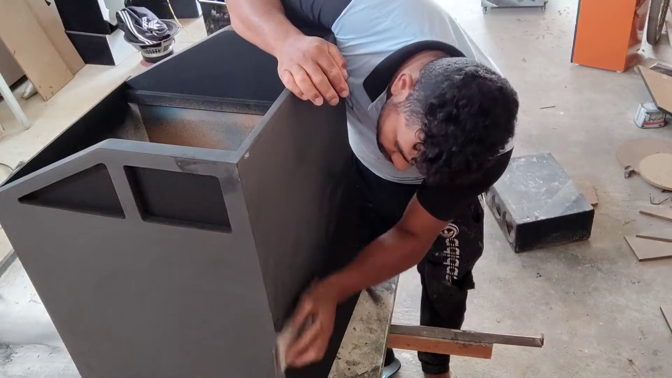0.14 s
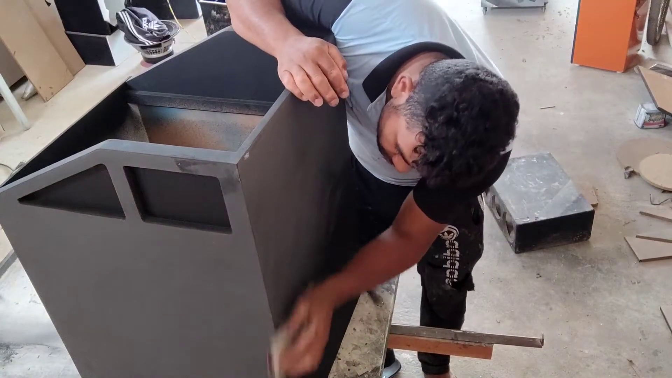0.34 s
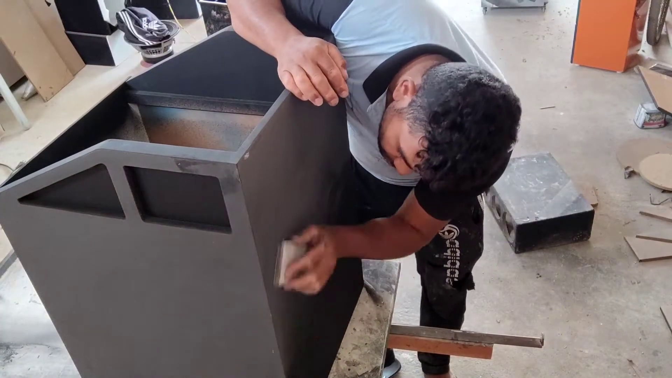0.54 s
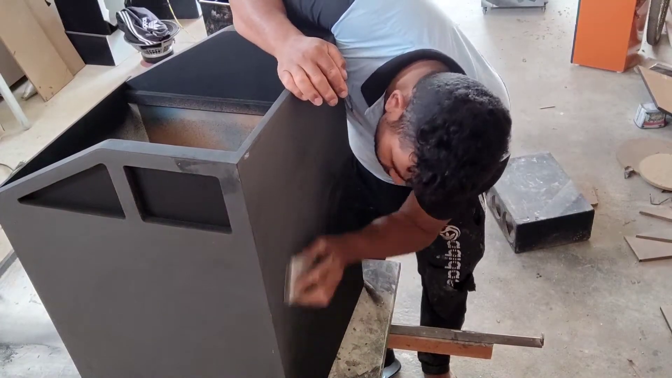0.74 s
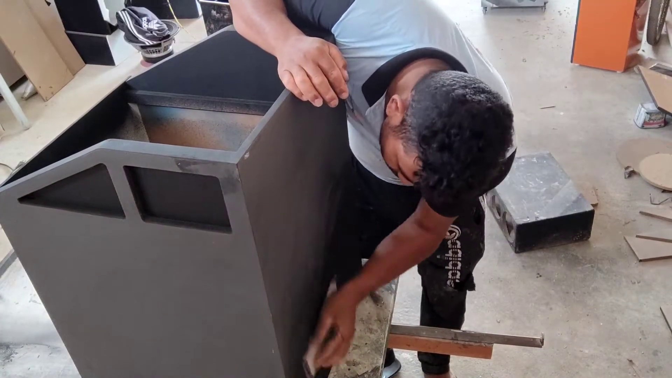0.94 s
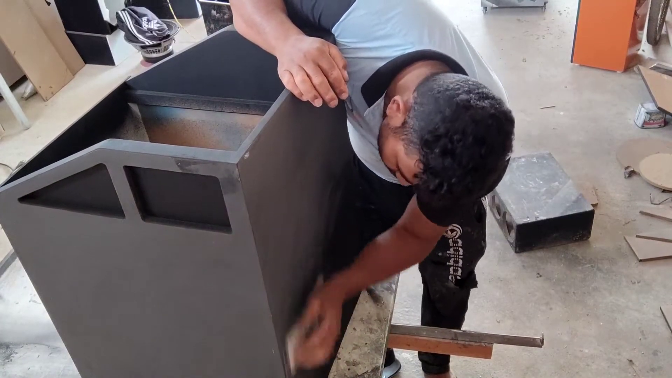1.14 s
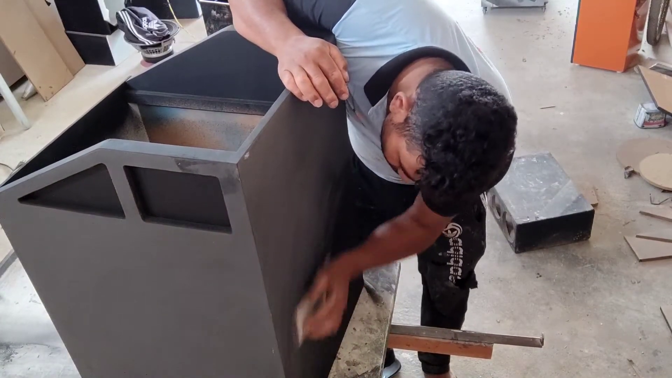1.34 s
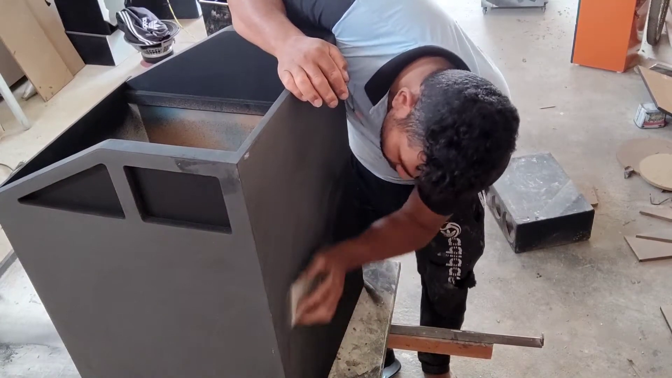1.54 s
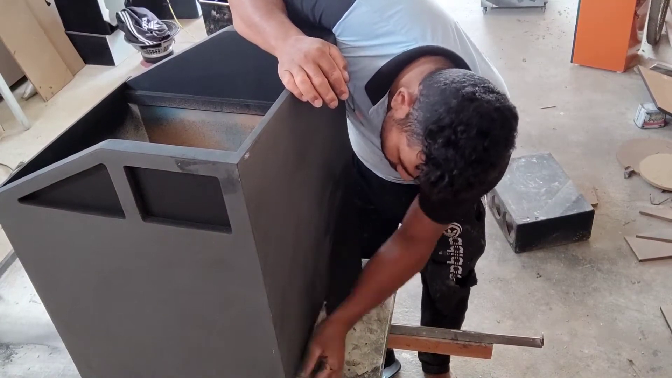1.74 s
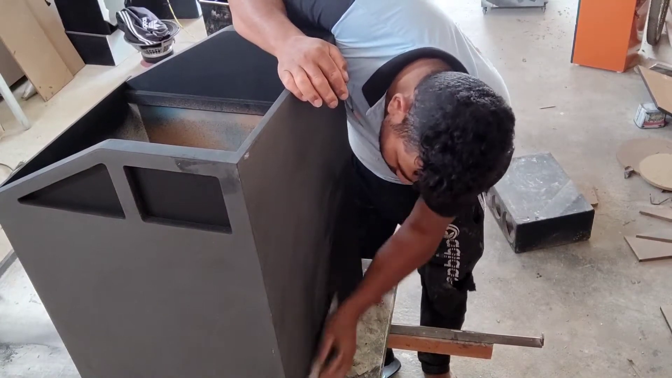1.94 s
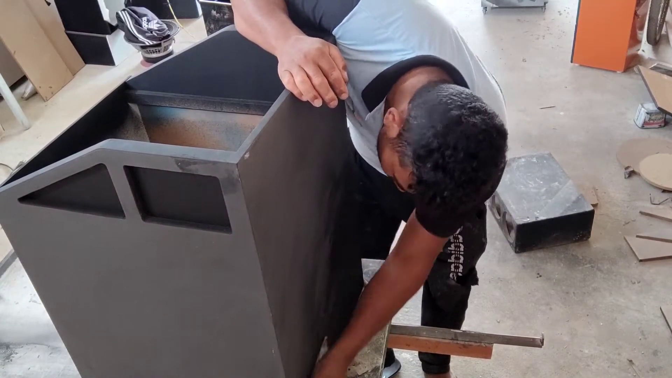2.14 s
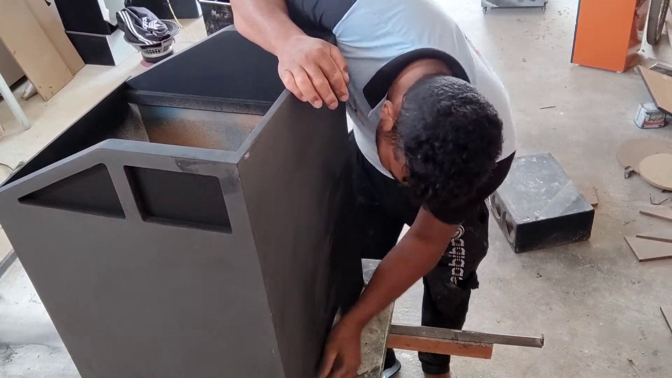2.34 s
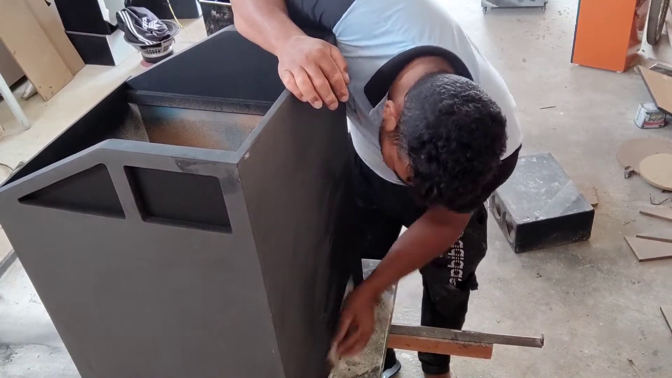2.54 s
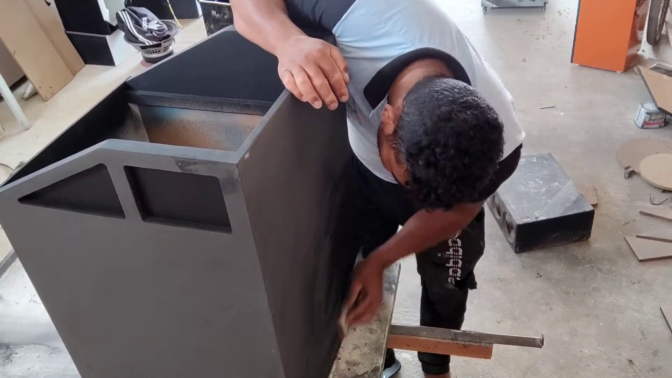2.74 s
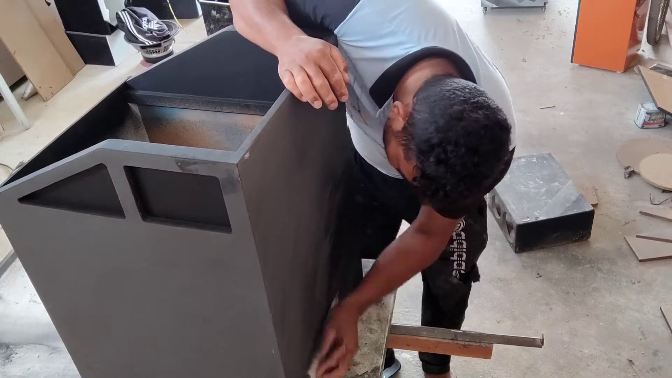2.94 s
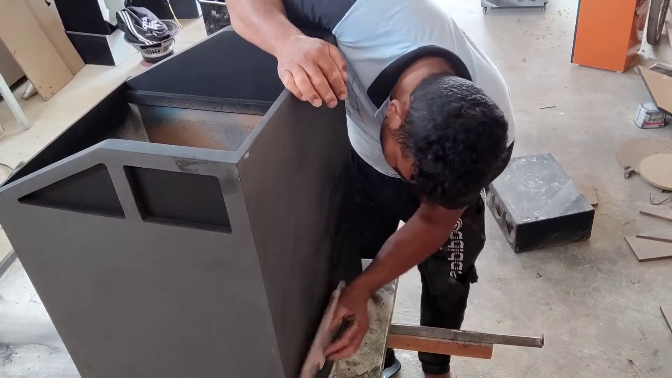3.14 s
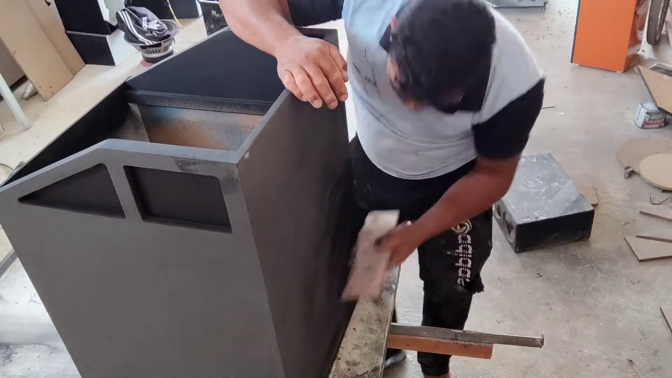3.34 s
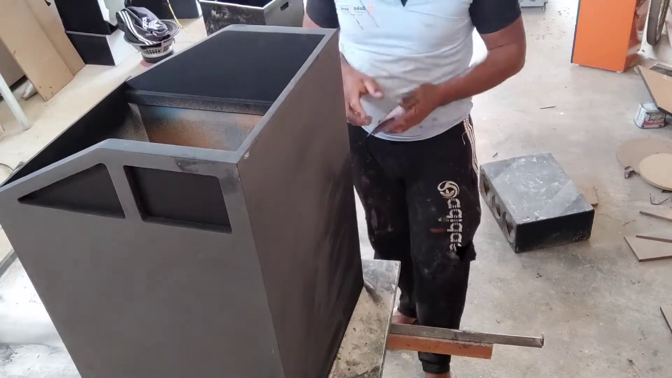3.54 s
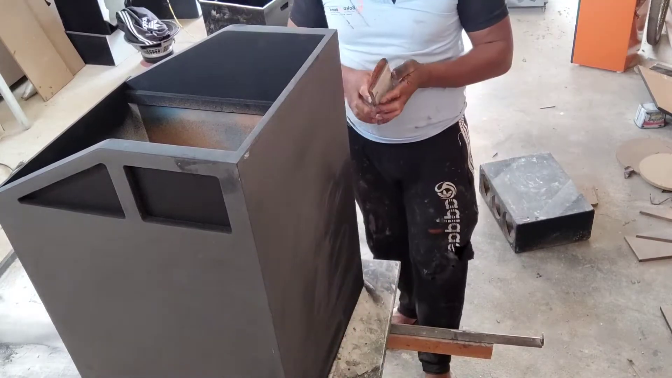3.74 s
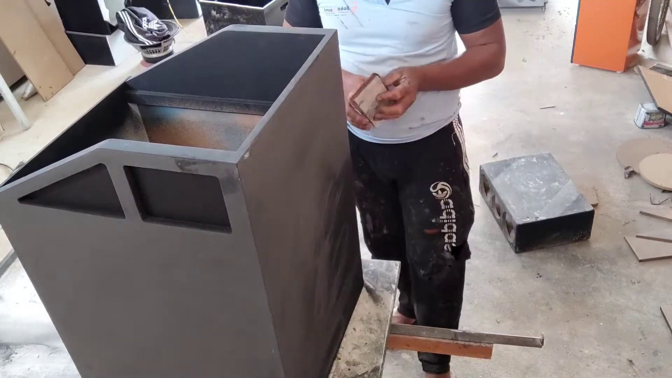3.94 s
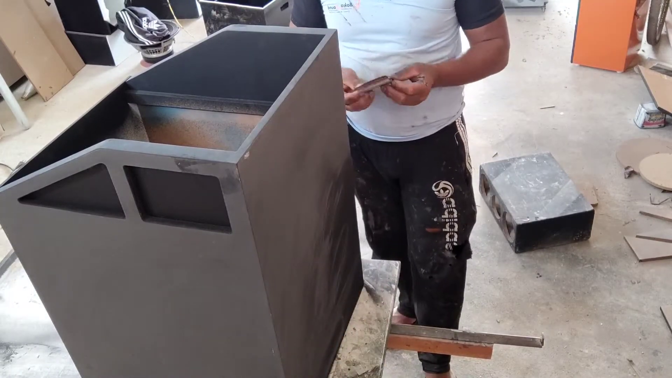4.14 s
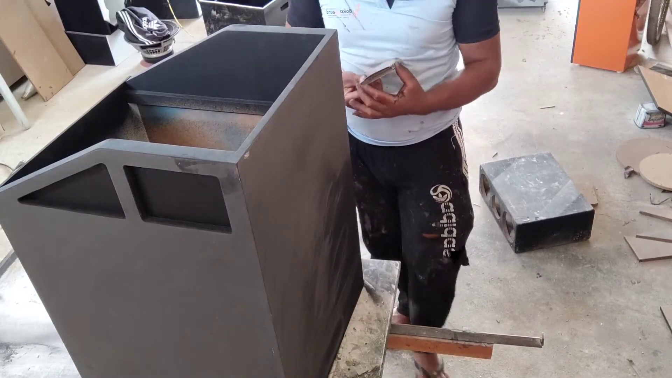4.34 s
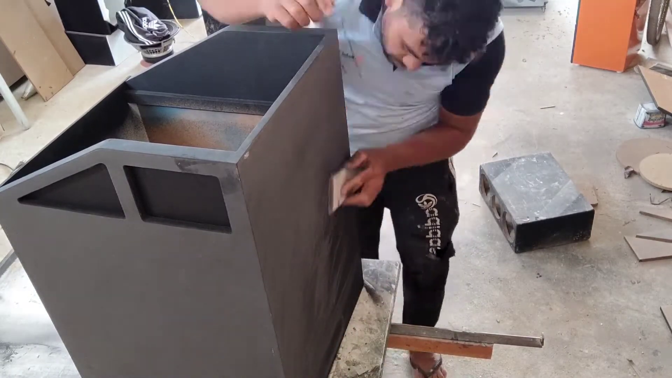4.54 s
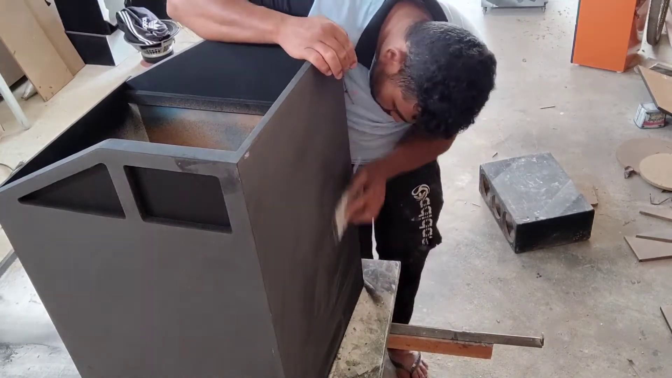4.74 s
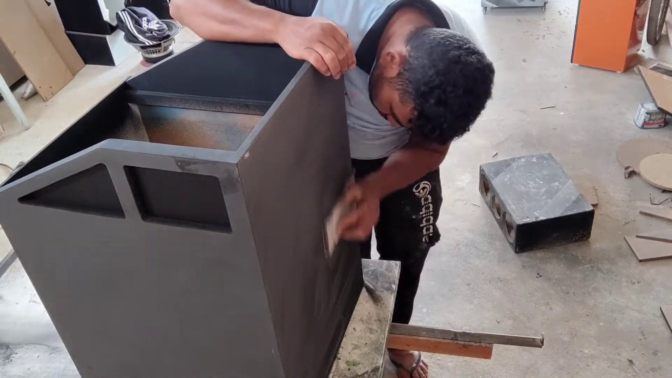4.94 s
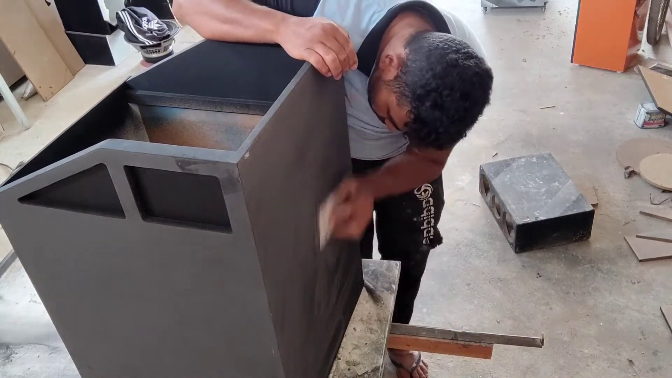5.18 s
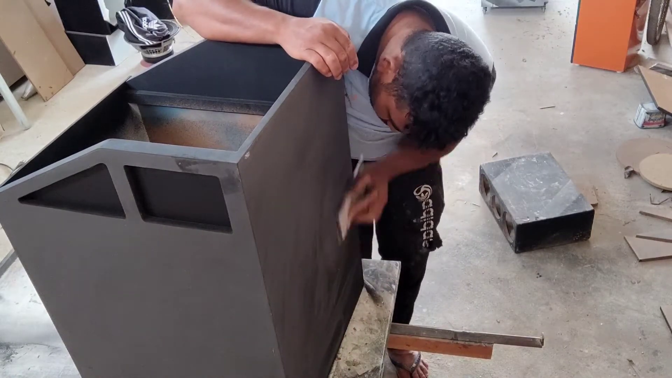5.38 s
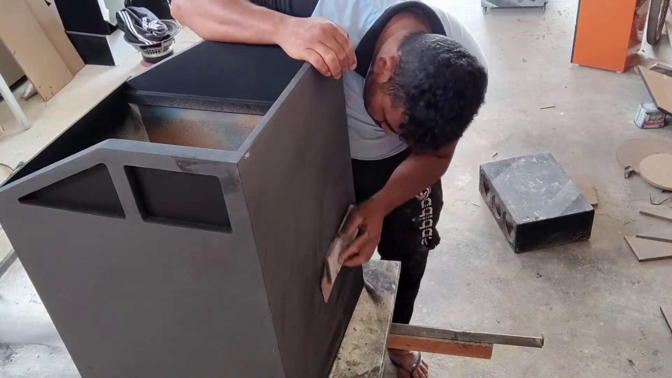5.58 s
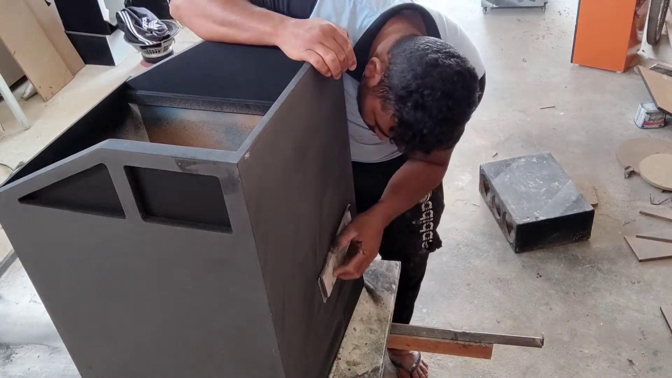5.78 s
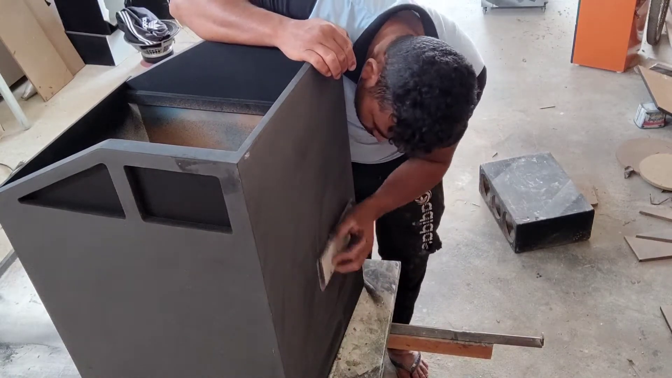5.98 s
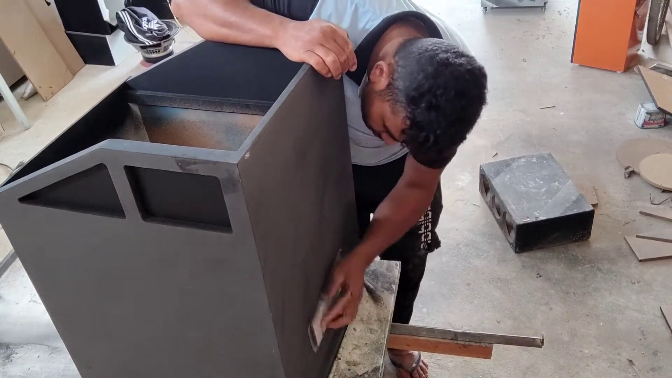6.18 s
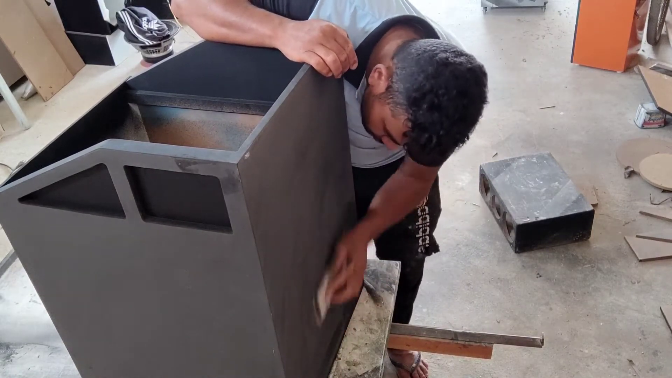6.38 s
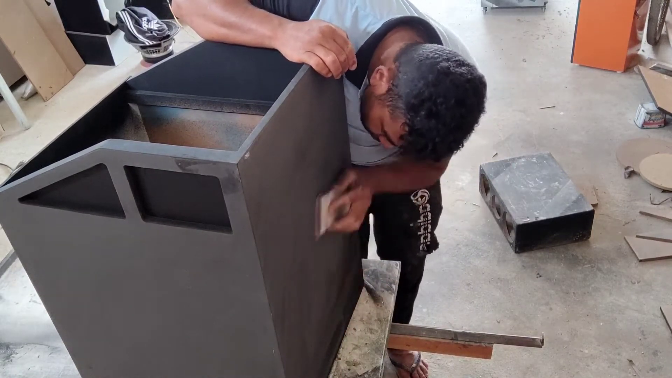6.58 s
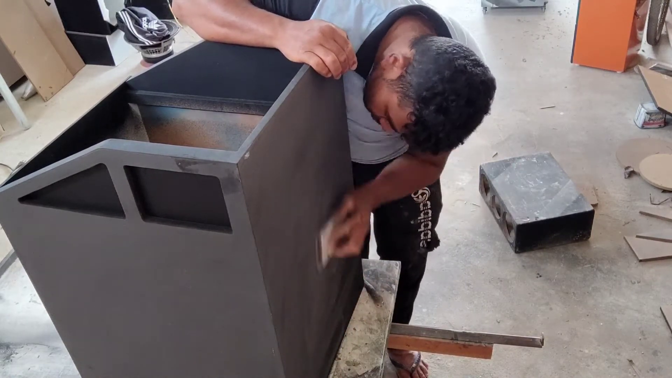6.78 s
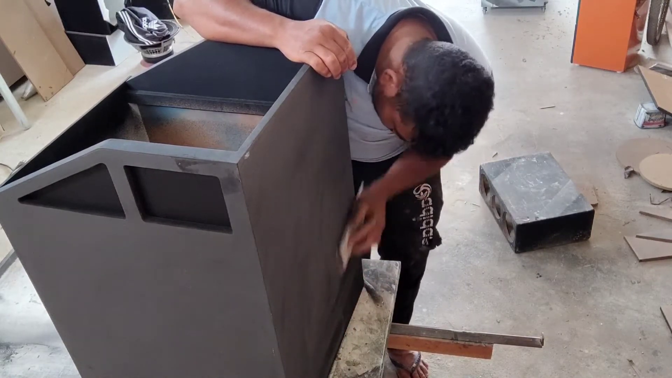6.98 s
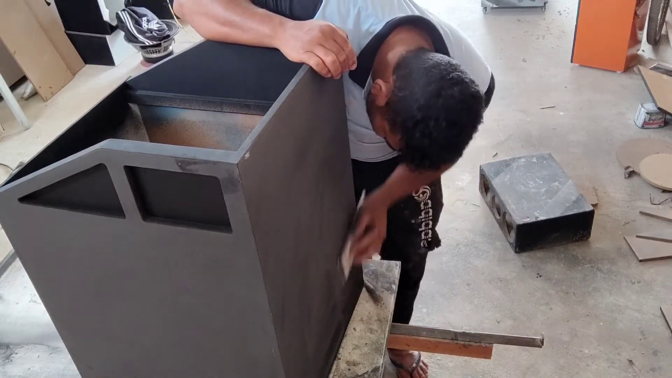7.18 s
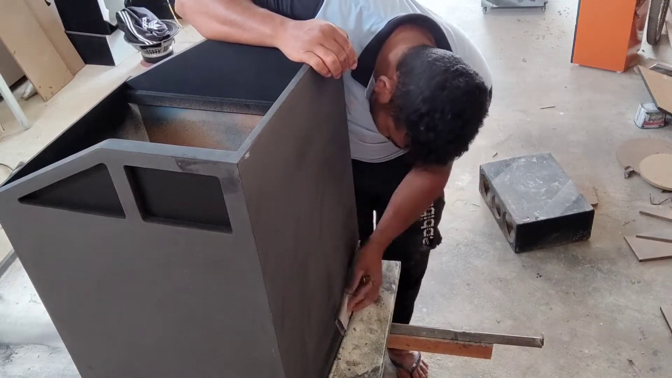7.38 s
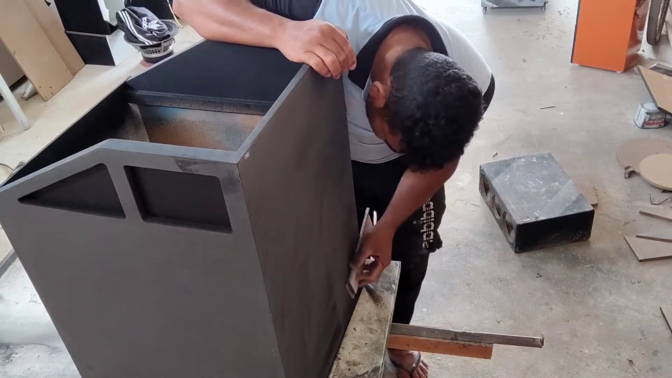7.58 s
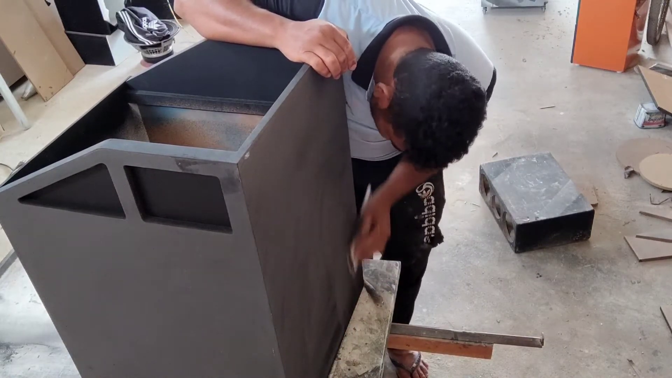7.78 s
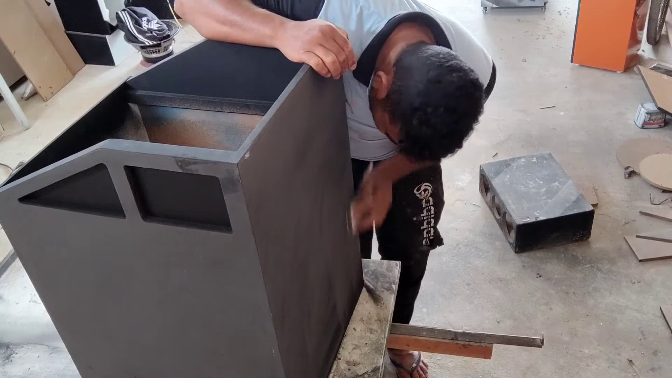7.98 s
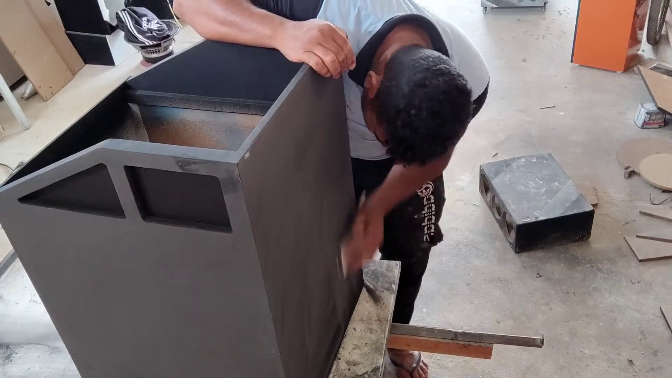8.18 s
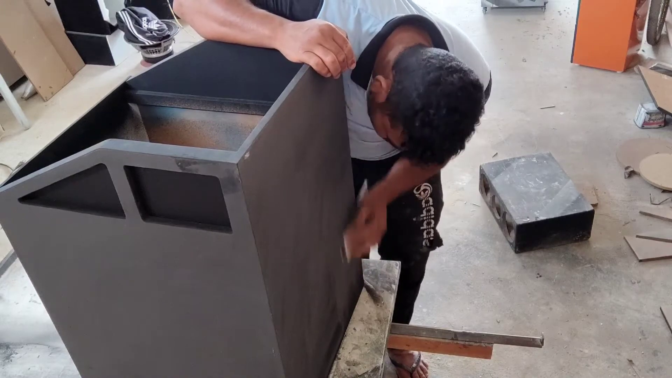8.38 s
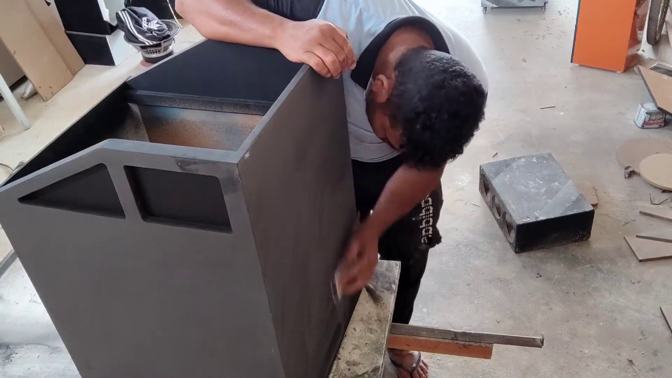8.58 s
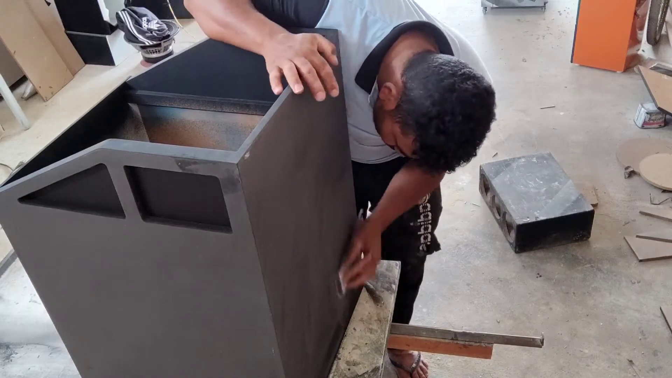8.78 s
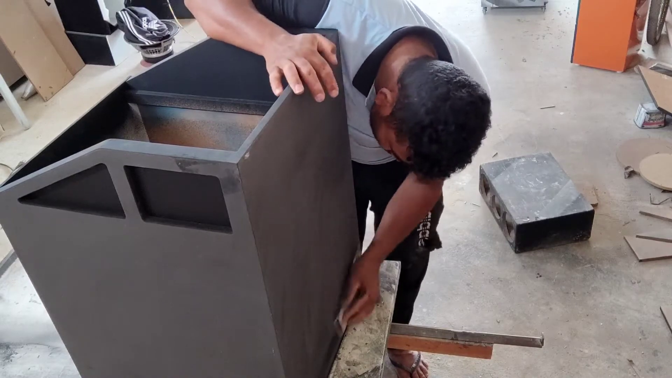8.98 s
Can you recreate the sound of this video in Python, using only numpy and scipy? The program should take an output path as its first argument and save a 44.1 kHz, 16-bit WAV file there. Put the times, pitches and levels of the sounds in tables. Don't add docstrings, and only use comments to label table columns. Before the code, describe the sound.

Heard close in a workshop with a low, wavering hum, sandpaper scrubs a coated hollow wooden box. From 0 s a bright, dense hiss pulses very fast, about twenty-five to thirty single strokes a second, dipping at every turn; a woody scrape and faint hollow hum lie under it. From 2.2 to 3.15 s strokes slow to ten or so a second and separate more clearly. The paper lifts; at 3.25 s a brush and clear mid-pitched knuckle knock, then small brushes and soft low thuds near 3.5 s. It is nearly silent, with a tiny far sole squeak at 3.75 s and thin grainy folding swishes around 4.1 s. At 4.57 s a bump starts rapid sanding again until 5.6 s. After light touches, another pass runs 6.05 to 7.57 s, and a last from 7.7 to 9.03 s, cutting off quickly. The treble is strong and resonant, differently coloured left and right, with a steep top cutoff.

```python
import sys
import numpy as np
from scipy import signal
from scipy.fft import rfft, irfft, next_fast_len
from scipy.io import wavfile
from scipy.ndimage import uniform_filter1d

SR = 44100
rng = np.random.default_rng(int(sys.argv[2]) if len(sys.argv) > 2 else 0)


def unload_audio(sound):
    columns = np.transpose(np.atleast_2d(sound))
    steps = np.round(np.clip(columns, -1, 1) * 32767)
    wavfile.write(sys.argv[1], SR, steps.astype(np.int16))


def invert_db(x):
    u = np.asarray(x, float) / 20
    return 10 ** u


N = 397775

# (first_turn_s, strokes, grit_level_db, dip_at_turn_db, panel_pressure_db)
MIDDLE_RUNS = [(4.575, 1, -23, 23, -23.5), (4.624, 2, -16, 9, -27.5), (4.707, 6, -16.5, 6.4, -27.5),
               (4.933, 2, -17.5, 4.5, -28.5), (5.018, 4, -17, 5.5, -27), (5.168, 1, -18, 3.8, -25.5),
               (5.25, 2, -17.5, 2.9, -26), (5.336, 2, -15.5, 7, -25.5), (5.41, 1, -18, 4.3, -27),
               (5.484, 3, -18, 4.7, -27.5)]
# (start_s, peak_db, fade_db_per_s, panel_pressure_db)
TOUCHES = [(3.257, -28.5, 340, -26), (3.366, -35.5, 260, -27), (3.395, -39, 700, -28.5),
           (3.437, -48, 500, -27), (3.484, -43, 300, -33), (3.51, -54.5, 300, -23), (3.53, -51, 700, -32),
           (3.591, -60, 250, -28), (3.624, -61, 152, -27), (3.678, -63, 300, -29),
           (3.813, -65.5, 250.5, -26), (3.871, -65, 250, -26.5), (3.924, -61, 350, -29),
           (4.02, -67, 150, -30), (4.096, -52, 350, -31.5), (4.169, -58, 350, -35.5),
           (4.274, -70, 300, -31), (4.298, -66, 500, -36), (4.402, -57, 200, -30),
           (4.441, -45.5, 550, -20.5), (4.494, -49.5, 450, -31), (4.52, -45, 600, -30.5),
           (5.61, -32.5, 240, -25), (5.689, -41.5, 270, -32), (5.731, -45, 500, -32),
           (5.89, -60.5, 450, -33), (5.958, -66, 176, -34), (6.034, -57, 200, -36.5), (6.01, -62, 100, -35),
           (7.655, -65, 100, -31.5), (7.69, -62, 300, -37)]
LANDING_S = 0.023


def sanding(t, speed, pressure_db):
    # (time_s, left_minus_right_db)
    sideways = [(0, -1.9), (3.5, -2.5), (4.24, -3), (4.6, -1.5), (9.02, -0.5)]
    # (pitch_hz, level_db_per_hz)
    grit = [(5000, -17), (6300, -7.5), (7300, -2.5), (10000, -0.5), (13000, 0.5), (15000, -4)]
    bite, give, panel_ring_s = 0.49, 0.35, 0.0027

    smooth_speed = np.sqrt(uniform_filter1d(speed ** 2, max(int(panel_ring_s * SR), 1)) + 1e-18)
    ringing = smooth_speed ** (1 - give)
    speed = speed * (speed / uniform_filter1d(speed, SR // 40)) ** bite

    pan_db = np.interp(t, *np.transpose(sideways))
    hiss = through_ports(coloured(grains(spread_db=0.36), grit))
    hiss = hiss / np.sqrt(np.mean(hiss ** 2))
    hiss = hiss * invert_db(0.6 + 1.4 * walk(120) + np.array([pan_db, -pan_db]) / 2)
    scrape = ringing * panel(t) * invert_db(pressure_db + 3.5 + 1.53 * walk(30))
    return speed * hiss + scrape


def hand(t):
    low_quick = [(0, 1, -18.5, -2.5, -27.5), (.032, 1, -18, 4, -25), (.103, 4, -17, 5, -26.5),
                 (.263, 2, -17, 6.5, -26), (.337, 4, -18, 5.5, -28.5), (.486, 2, -20.5, 7, -28.5),
                 (.56, 2, -17, 10, -28), (.644, 2, -20, 9, -28), (.729, 1, -17.5, 6, -27),
                 (.786, 1, -17.5, 6, -27), (.821, 1, -17, 8.5, -26.5), (.876, 1, -17, 3, -23.5),
                 (.978, 1, -18, 2.5, -24), (1.05, 2, -15.5, 7.5, -26.5), (1.127, 8, -16.2, 11, -27),
                 (1.453, 2, -17, 8, -26), (1.543, 4, -18, 5, -26), (1.707, 2, -17.5, 6.5, -26.5),
                 (1.788, 2, -16, 9, -26), (1.885, 2, -17, 6, -25.5), (2.044, 1, -16.5, 2.5, -26),
                 (2.085, 2, -18.5, 1, -25.5)]
    low_slow = [(2.225, 1, -21, 11, -24.5), (2.306, 1, -22.5, 8.2, -23.5), (2.387, 1, -18, 16.4, -27),
                (2.481, 1, -18, 7, -25), (2.565, 1, -17.5, 17, -27.5), (2.666, 1, -17.5, 5.9, -24.5),
                (2.755, 1, -17.5, 16.4, -29.5), (2.847, 1, -17, 3.8, -24.5), (2.916, 1, -16, 7, -29.5),
                (2.976, 2, -17, 5.6, -25), (3.088, 1, -18, 4.7, -23)]
    upper = [(6.045, 1, -28.5, 12, -27), (6.087, 2, -18, 11, -27), (6.159, 4, -18.5, 3.2, -27),
             (6.316, 4, -18, 2.9, -26.5), (6.49, 2, -16.5, 4.3, -25), (6.59, 2, -17.5, 5.9, -25.5),
             (6.664, 2, -19, 2.2, -24.5), (6.747, 2, -19, 3.7, -26.5), (6.834, 1, -18.5, 2.3, -27),
             (6.916, 2, -17, 7.4, -26.5), (7.002, 8, -17, 8.7, -26), (7.336, 2, -17.5, 8.7, -26),
             (7.427, 2, -16.3, 7.5, -26), (7.513, 1, -16.5, 9.7, -27.5), (7.548, 1, -20, 2, -25.5)]
    last = [(7.719, 1, -21.5, 23.4, -25), (7.778, 2, -17.5, 9.6, -25), (7.853, 4, -18.5, 6.2, -27),
            (8.014, 2, -20.5, 4.9, -29.5), (8.089, 2, -22, 7.1, -25), (8.164, 2, -19, 8.6, -27),
            (8.25, 2, -18.7, 6.8, -26), (8.322, 1, -19, 4.3, -27), (8.4, 2, -19, 5, -26.5),
            (8.493, 2, -19, 2.3, -27), (8.565, 1, -19, 3.9, -27.5), (8.64, 2, -19.5, 3.5, -27),
            (8.723, 1, -19.5, 3, -26), (8.767, 1, -19, 2.8, -26.5), (8.86, 2, -18.5, 3, -25.5),
            (8.949, 1, -20, 1.8, -27.5)]
    # (time_s, grit_level_db, fall_db_per_s)
    lifts = [
        (3.148, -29, 421),
        (5.601, -25.5, 500),
        (7.573, -23.5, 650),
        (9.03, -23, 500),
    ]
    round_top, rest_db = 0.042, -76.5

    runs = [low_quick + low_slow, MIDDLE_RUNS, upper, last]
    passes = [strokes(*one) for one in zip(runs, lifts)]
    times, db = np.vstack([shape for shape, _ in passes]).T
    stroking = np.interp(t, times, invert_db(round_top * db)) ** (2 / round_top)
    touching = peaks(t, TOUCHES, rise_db_s=1400)
    resting = invert_db(2 * (rest_db + 1.5 * walk(24.94)[0]))
    speed = np.sqrt(stroking + touching + resting)

    pressure = [row for _, rows in passes for row in rows]
    pressure = sorted(pressure + [(row[0], row[3]) for row in TOUCHES])
    return uniform_filter1d(speed, SR // 200), np.interp(t, *np.transpose(pressure))


def strokes(runs, lift):
    push_share, rise_share = 0.5, 0.42
    fall_s, sag_db = 0.026, 1.5
    pull_db, pull_dip, pull_panel_db = -0.12, 0.64, -1.5
    scatter_db, silent_db = -0.1, -79
    lift_s, lift_db, fall_db_s = lift

    shape, pressure = [(runs[0][0] - LANDING_S, silent_db)], []
    ends = [run[0] for run in runs[1:]] + [lift_s]
    for (start, count, db, dip_db, panel_db), end in zip(runs, ends):
        count = int(round(count))
        step = (end - start) / count
        turns = [start + step * (k - k % 2 + k % 2 * 2 * push_share) for k in range(count)] + [end]
        for k, chance in enumerate(scatter_db * rng.standard_normal((count, 3))):
            pull = k % 2
            full = turns[k] + rise_share * (turns[k + 1] - turns[k])
            glide = max(turns[k + 1] - fall_s, full + 1e-3)
            top = db + pull * pull_db + chance[0]
            shape.append((turns[k], db - dip_db * pull_dip ** pull + chance[1]))
            shape.append((full, top))
            shape.append((glide, top - sag_db * (glide - full) / fall_s))
            pressure.append((full, panel_db + (pull - (count > 1) / 2) * pull_panel_db + chance[2]))
    shape.append((lift_s, lift_db))
    shape.append((lift_s + (lift_db - silent_db) / fall_db_s, silent_db))
    return shape, pressure


def panel(t):
    foot = [(530, -48.5), (900, -24), (1960, -14), (2980, -8.5), (4180, -6.5), (6400, -4.5), (8320, -22.5),
            (14100, -120)]
    paper = [(530, -31), (900, -10), (1210, -8), (1480, -3.5), (2910, 0), (6400, -1), (8320, -4),
             (14100, -120)]
    higher = [(530, -28), (900, -25), (1120, -17.5), (1600, -14), (2820, -5), (4350, -5), (6400, -4),
              (8320, -19), (14100, -120)]

    place = np.searchsorted([TOUCHES[0][0] - LANDING_S, MIDDLE_RUNS[0][0] - LANDING_S], t)
    scrape = patchy(grains(spread_db=1.2), mode_db=4)
    tones = [coloured(scrape, tone, 1200, 5000) for tone in (foot, paper, higher)]
    return np.choose(place, tones)


def through_ports(x):
    # (pitch_hz, width_hz, lift_db, slope_above_db_per_khz)
    holes = [
        (11060, 1470, 14, 0),
        (8920, 820, 15.5, -0.62),
    ]
    x = np.pad(x, ((0, 0), (0, next_fast_len(N + 1) - N)))
    return np.array([port(side, *hole)[:N] for side, hole in zip(x, holes)])


def port(x, hz, width_hz, lift_db, slope_db):
    f = np.arange(len(x) // 2 + 1) * SR / len(x)
    gain = np.sqrt(1 + invert_db(2 * lift_db) / (1 + (2 * (f - hz) / width_hz) ** 2))
    loss = invert_db(slope_db * np.maximum(f - hz, 0) / 1000)
    return irfft(rfft(x) * gain * loss, len(x))


def body(t, speed):
    # (pitch_hz, level_db_per_hz)
    box = [(120, -13.5), (250, -5), (400, 0), (600, -0.5), (1000, -1), (2200, -14)]
    # (peak_s, peak_db, slope_both_sides_db_per_s)
    leans = [(.25, -58.5, 48), (.91, -61, 19.5), (2.45, -55.5, 122), (2.63, -47.5, 238), (3.1, -64.5, 62),
             (3.262, -61.5, 75), (3.36, -64, 54), (3.52, -68, 84), (3.62, -67, 10), (4.44, -74, 66),
             (5.61, -54, 250), (5.9, -74.5, 21), (6.06, -62.5, 150), (7.79, -64.5, 71)]
    hum_db, stroke_db, follows = -63, -20.5, 0.34

    driven = invert_db(hum_db) * (uniform_filter1d(speed, SR // 30) / invert_db(stroke_db)) ** follows
    level = np.sqrt(driven ** 2 + peaks(t, leans))
    return coloured(partly_alike(0.27), box, 280, 1065) * level * invert_db(1.0 * walk(18))


def folding(t):
    # (peak_s, peak_db, slope_both_sides_db_per_s)
    folds = [
        (4.02, -71, 300),
        (4.072, -55, 450),
        (4.128, -54, 350),
        (4.192, -59, 450),
    ]
    # (pitch_hz, level_db_per_hz)
    colour = [(6800, -25), (7500, -7), (8800, 0), (9800, -20)]
    pan_db = -8
    swish = coloured(grains(spread_db=2.0), colour)
    swish = swish * invert_db(np.array([[pan_db], [-pan_db]]) / 2 + 2.0 * walk(80))
    return swish * np.sqrt(peaks(t, folds))


def knuckle_taps():
    # (start_s, peak_db, pitch_hz)
    taps = [
        (3.253, -39.5, 880),
        (3.305, -55, 860),
    ]
    return knocks(taps, t60_s=0.14, soft_s=0.0037, rough=0.46)


def box_bumps():
    # (start_s, peak_db, pitch_hz)
    bumps = [
        (1.552, -57, 155),
        (3.486, -54, 180),
        (3.517, -48, 145),
        (4.574, -47.5, 163),
        (5.869, -61.5, 124),
        (6.242, -53, 157),
    ]
    return invert_db(16) * knocks(bumps, t60_s=0.066, soft_s=0.0098, rough=0.29)


def sole_squeak():
    # (start_s, peak_db, pitch_hz)
    squeak = [
        (3.745, -68, 3820),
    ]
    return invert_db(9) * knocks(squeak, t60_s=0.17, soft_s=.02, rough=.05)


def knocks(events, t60_s, soft_s, rough):
    out = np.zeros(N + SR)
    t = np.arange(SR // 2) / SR
    chance = rng.standard_normal((len(events), len(t)))
    for (s, db, hz), noise in zip(events, chance):
        skirt = signal.lfilter(*signal.iirpeak(hz, 1.5, fs=SR), noise)
        ring = (1 - rough) * np.sin(2 * np.pi * hz * t) + rough * skirt / np.std(skirt)
        envelope = (1 - np.exp(-t / soft_s)) * invert_db(-60 * t / t60_s)
        out[int(s * SR):][:len(t)] += invert_db(db) * ring * envelope
    return out[:N]


def workshop():
    # (pitch_hz, level_db_per_hz)
    shop = [(20, 2), (40, 2.5), (80, -5.5), (132, 3), (200, 0), (300, -8.5), (1000, -30), (1600, -28.5),
            (15000, -52)]
    return coloured(partly_alike(0.29), shop) * invert_db(-66 + 2.8 * walk(9))


def coloured(x, points, low_hz=0, high_hz=20000):
    hz, db = np.transpose(points)
    size = next_fast_len(N)
    f = np.maximum(np.arange(size // 2 + 1) * SR / size, 1)
    lines = rfft(x, size) * invert_db(np.interp(np.log(f), np.log(hz), db, left=-60, right=-60))
    band = lines[:, (f > low_hz) & (f < high_hz)]
    power = 2 * np.mean(np.sum(np.abs(band) ** 2, axis=1)) / size ** 2
    return irfft(lines, size)[..., :N] / np.sqrt(power)


def walk(rate):
    k = int(SR / rate)
    held = np.repeat(rng.standard_normal((2, N // k + 1)), k, axis=1)
    return 0.99 * uniform_filter1d(uniform_filter1d(held, k), k)[:, :N]


def grains(spread_db):
    return rng.standard_normal((2, N)) * invert_db(spread_db * rng.exponential(size=(2, N)))


def partly_alike(likeness):
    share = np.clip(likeness, 0, 1)
    noise = np.sqrt(share) * rng.standard_normal(N) + np.sqrt(1 - share) * rng.standard_normal((2, N))
    return patchy(noise, mode_db=2.5)


def patchy(x, mode_db):
    cells = signal.stft(x, nperseg=1024)[2]
    ports, bins, frames = cells.shape
    chance_db = mode_db * rng.standard_normal((ports, bins, frames // 3 + 1))
    gain = np.repeat(invert_db(chance_db), 3, axis=2)
    return signal.istft(cells * gain[..., :frames], nperseg=1024)[1][:, :N]


def peaks(t, rows, rise_db_s=None):
    ms = np.arange(0, t[-1] + 1, 1e-3)
    power = 0
    for s, db, fade, *_ in rows:
        below_db = np.where(ms < s, (rise_db_s or fade) * (s - ms), fade * (ms - s))
        power = power + invert_db(2 * (db - below_db))
    return np.interp(t, ms, power)


def scene():
    t = np.arange(N) / SR
    speed, pressure_db = hand(t)
    rubbing = sanding(t, speed, pressure_db) + body(t, speed) + folding(t)
    blows = knuckle_taps() + box_bumps()
    return rubbing + blows + sole_squeak() + workshop()


def starved(x):
    # (pitch_hz, share_of_bands_muted)
    muted = [(0, .05), (1500, .12), (4200, .32), (6200, 0)]
    hz, _, cells = signal.stft(x, SR, nperseg=1024)
    power = np.sum(np.abs(cells) ** 2, axis=(0, 1))
    loud = np.where(power > np.mean(power) / 20, 1, .1)
    share = np.outer(np.interp(hz, *np.transpose(muted)), loud)
    for bins, frames, often in ((3, 3, .8), (5, 4, .35), (8, 4, .2)):
        chance = rng.random((len(hz) // bins + 1, len(power) // frames + 1))
        chance = np.kron(chance, np.ones((bins, frames)))
        cells = cells * (chance[:len(hz), :len(power)] > often * share)
    return signal.istft(cells, nperseg=1024)[1][:, :N]


def roll_off(x):
    return signal.sosfilt(signal.butter(12, 15540, fs=SR, output="sos"), x)


def record(dry):
    low_pass = signal.ellip(12, .3, 80, 14280, fs=SR, output="sos")
    mix = starved(signal.sosfilt(low_pass, dry))
    return roll_off(mix)


dry = scene()
out = record(dry)
unload_audio(out)
```